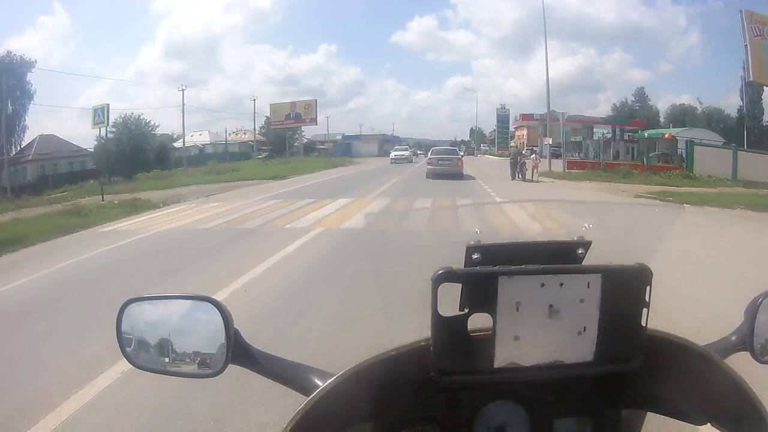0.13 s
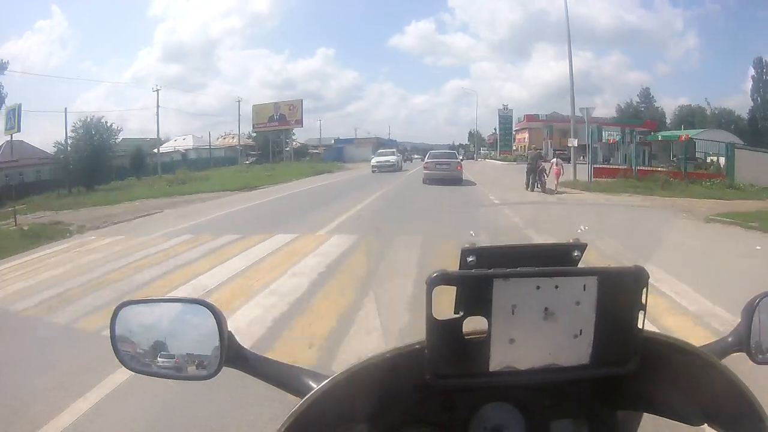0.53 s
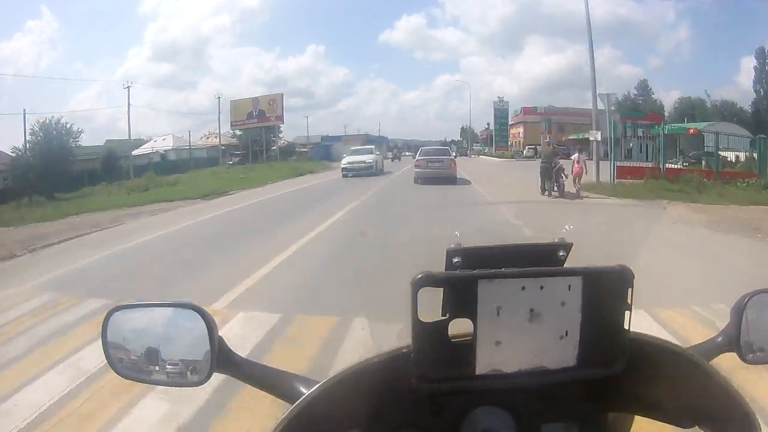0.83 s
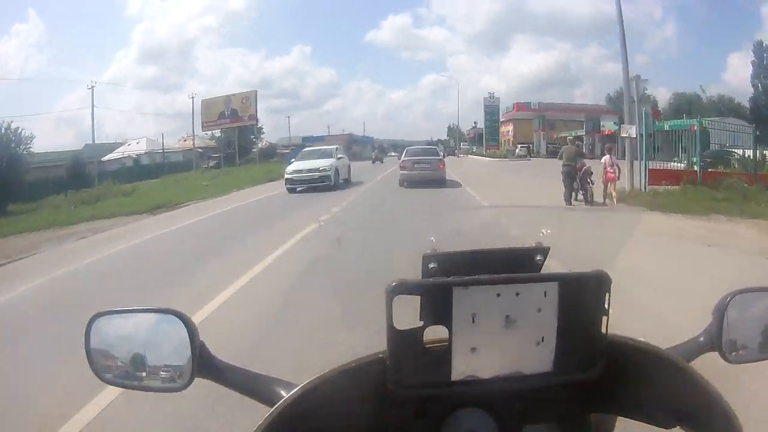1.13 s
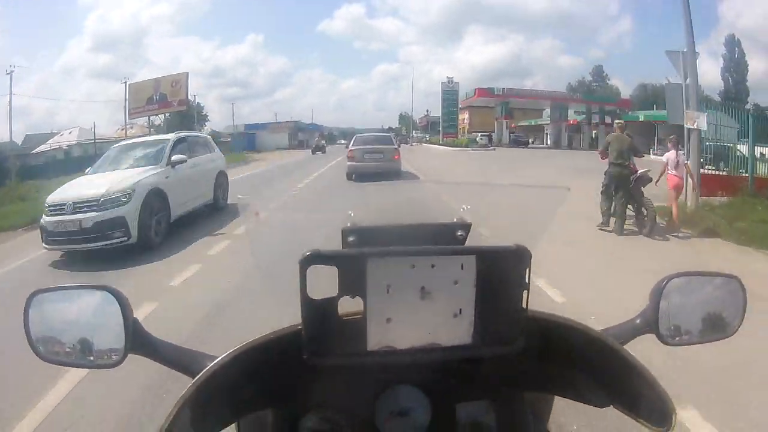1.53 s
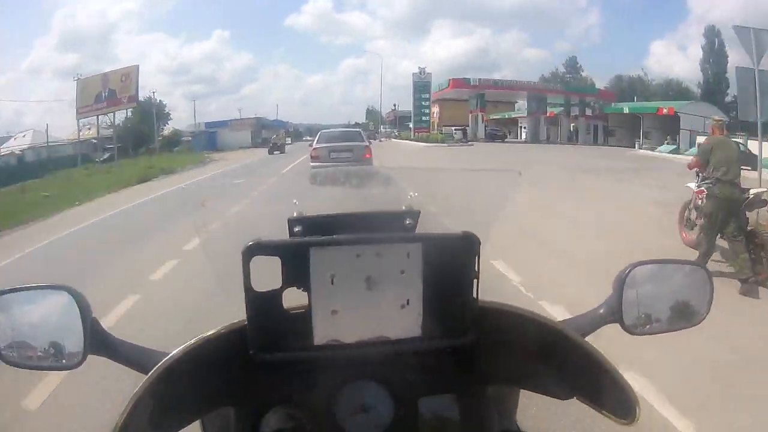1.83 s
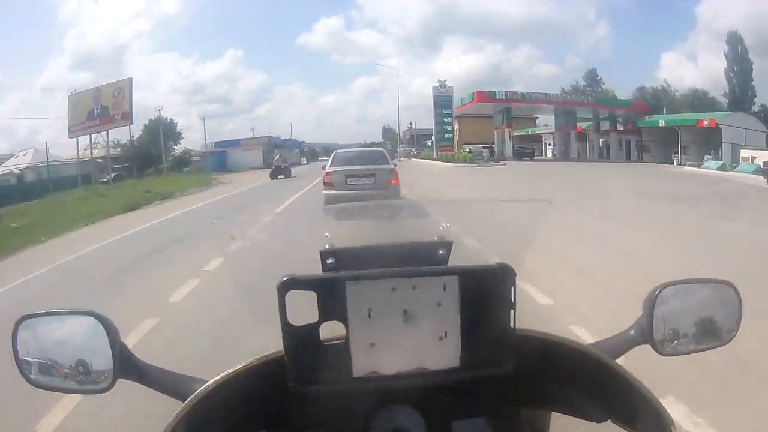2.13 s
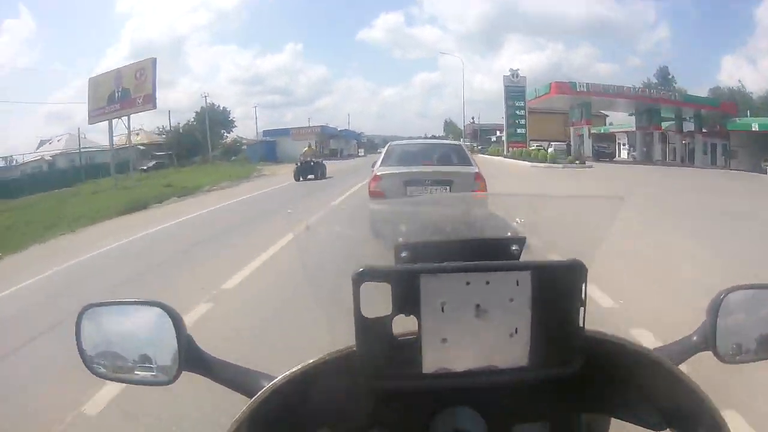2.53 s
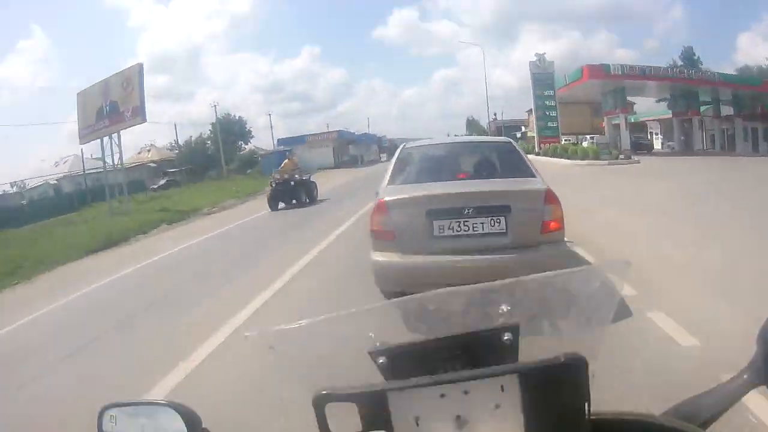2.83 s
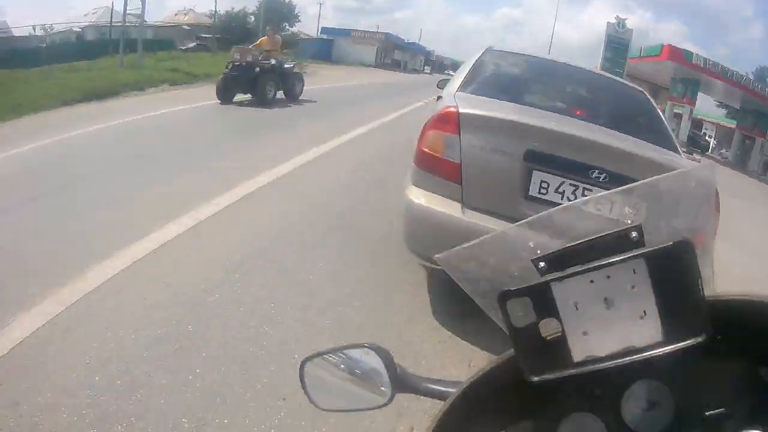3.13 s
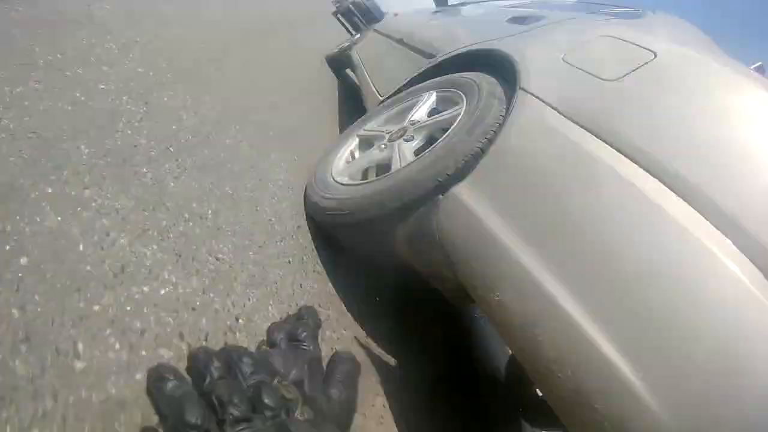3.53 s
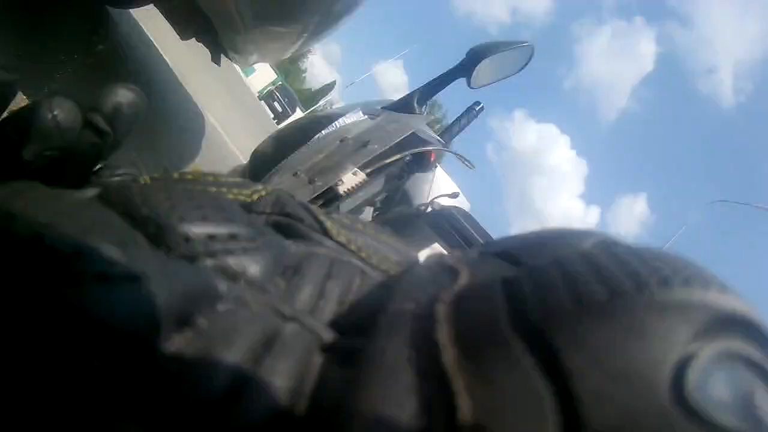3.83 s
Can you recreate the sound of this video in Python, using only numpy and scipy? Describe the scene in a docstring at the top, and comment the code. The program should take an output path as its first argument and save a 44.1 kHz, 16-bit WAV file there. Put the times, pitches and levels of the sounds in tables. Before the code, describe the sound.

Motorcycle crash, close and mono inside a boxy helmet-mounted housing. From 0 to 2.7 s, a quiet, unsteady low engine drone sits under lumpy wind and faint road hiss. Around 2.7-3.27 s the tyre squeals, wavering and rising, while the engine fades. From 3.27 s come knocks; at 3.35-3.95 s, irregular violent crunches, plastic cracks, deep thumps, short rubbing squeaks and gritty scraping overload the microphone, continuing until about 4 s.

```python
"""Open road, heard from inside a closed housing on a motorcyclist's helmet.
A wavering sine is the low engine drone; shaped noise is wind and road hiss. The rider brakes and a tyre
squeals: narrow noise bands around tones. The bike clips a car and falls: blows of crunch, cracks in a
plastic shell and low thumps, with rubbing tones and gritty scraping, overload the small recorder."""
import sys
import numpy as np
from scipy import signal
from scipy.fft import rfft, irfft
from scipy.io import wavfile

SR = 44100
rng = np.random.default_rng(int(sys.argv[2]) if len(sys.argv) > 2 else 0)


def wrap_up_sound(samples):
    """Save the sound to the file named by the first command line argument, as 16-bit audio."""
    columns = np.atleast_2d(samples).T
    # keep every value between -1 and 1, then stretch to whole-number steps
    tamed = np.clip(columns, -1, 1)
    steps = np.round(tamed * 32767).astype(np.int16)
    wavfile.write(sys.argv[1], SR, steps)


N = 176400
TIME_S = np.arange(N) / SR

# blows: t/s, length/s, crunch level/dB, crack drive/dB, thump level/dB, thump f/Hz
BLOWS = [(2.766, 0.0017, -33, -34, -58, 200), (2.7808, 0.0021, -21.5, -0.5, -26, 300),
         (3.266, 0.005, -22.5, -26.5, -41.5, 80.4), (3.292, 0.0034, -30, -16, -13, 59),
         (3.3295, 0.0064, -21.5, -20, -27, 98), (3.344, 0.0045, -15.5, -36, -39, 200),
         (3.3509, 0.0021, -6.5, 2.5, -35, 200), (3.3595, 0.0017, -1, 5, 3, 204),
         (3.3775, 0.0023, -7.5, -19, -5.5, 108), (3.407, 0.0084, -17.5, -10, -30, 101),
         (3.4408, 0.0043, 3.5, 19.5, -14, 119), (3.451, 0.0092, 8.5, 19, 10.5, 894),
         (3.517, 0.0036, -42, -25, -6.5, 54.6), (3.585, 0.004, -20.5, -16, -27, 55),
         (3.651, 0.0038, -18, -5.5, -11, 82.5), (3.675, 0.01, 9.5, 15.5, 7.5, 58.5),
         (3.698, 0.0026, -24, -1, 4, 66), (3.713, 0.0047, -2, 12, 14, 54.7),
         (3.726, 0.0058, 13.5, -6, 20.5, 84), (3.737, 0.0097, 8.5, 18, 7.5, 86),
         (3.75, 0.014, 6, 3.5, 8, 50.5), (3.777, 0.01, -10.5, -16.5, 26, 186.6),
         (3.805, 0.0027, -9, -25, 6, 195), (3.819, 0.0044, -19.5, -27, -4, 153),
         (3.904, 0.001, -26, -18, -20, 100), (3.9171, 0.0045, 8.5, 14.5, 21, 257),
         (3.926, 0.0037, 13, -1, -18, 252), (3.939, 0.021, -13, -16.5, -1.5, 86),
         (3.957, 0.0043, -7.5, -4, -18, 205), (3.9833, 0.0023, -16, -14, -29, 150)]
BURST_RISE_S, BURST_T60_S = 0.00027, 0.021
WAVER = 0.012  # relative pitch spread of squeal and rubs


def blows():
    """Each blow is a crunch through the housing, cracks and a low ringing thump."""
    # crunch spectrum: f/Hz, density/dB per Hz
    crunch_spectrum = [(150, 1), (400, 1), (900, -2.5), (1500, -5.5), (2300, -6), (3000, -28.5),
                       (5000, -19), (7500, -45.5), (10000, -35), (15000, -38.5)]
    thump_cycles, thump_extra_s = 2.75, 0.016  # both lengthen the thump's 60 dB decay
    rough_noise = rng.standard_normal(N) * amp(3.0 * drift(300))
    crunch = housing(colour(rough_noise, crunch_spectrum), share=0.5)
    out = crunch * sum(burst(*row[:3]) for row in BLOWS) + cracks()
    signs = rng.choice([-1, 1], len(BLOWS))
    for (start_s, *_, db, hz), sign in zip(BLOWS, signs):
        first = int(start_s * SR)
        t = np.arange(N - first) / SR
        t60_s = thump_cycles / hz + thump_extra_s
        out[first:] += sign * amp(db - 60 * t / t60_s) * np.sin(2 * np.pi * hz * t)
    return out


def cracks():
    """A snap at the start of each blow and random clicks during it ring the modes of a plastic shell."""
    # shell modes: f/Hz, relative level/dB, t60/s
    shell = [(680, -10, 0.017), (894, -9, 0.035), (1283, -2.5, 0.019), (1970, -0.5, 0.012),
             (3720, -2.5, 0.0063), (5310, -7, 0.0085), (6100, -4.5, 0.0022), (9650, -23, 0.0031)]
    cracks_per_s, scatter_db = 520, 4.04
    clicks = (rng.random(N) < cracks_per_s / SR) * rng.uniform(-1.56, 1, N)
    clicks = clicks * sum(burst(s, length, db) for s, length, _, db, *_ in BLOWS)
    for start_s, _, _, db, *_ in BLOWS:
        clicks[int(start_s * SR) + 20] += amp(db)  # snap, 20 samples into the blow
    out = 0
    for k, (hz, db, t60_s) in enumerate(shell):
        r, w = amp(-60 / (t60_s * SR)), 2 * np.pi * hz / SR
        drive = 0.34 * clicks * amp(db + scatter_db * rng.standard_normal(N)) + 1e-18
        ring = signal.lfilter([0, np.sin(w)], [1, -2 * r * np.cos(w), r * r], drive)
        out = out + (-1) ** k * ring  # alternate mode polarity
    return out


def scrape():
    """Scraping on asphalt: dense grit clicks through the housing over a low rumble."""
    # course: t/s, grinding level/dB, rumble level/dB
    course = [(2.86, -62, -72), (3.24, -35.5, -48.5), (3.27, -40, -26), (3.32, -29.5, -28),
              (3.39, -26.5, -16.5), (3.43, -17.5, -22.5), (3.48, -19, -11.5), (3.50, -29, -31),
              (3.56, -30.5, -23), (3.60, -15.5, -31), (3.655, -19, -16), (3.72, -15.5, 5),
              (3.80, -23.5, -2), (3.835, -33, -13.5), (3.89, -55, -21.5), (3.97, -26, -21),
              (4.0, -27, -12.5)]
    # grit spectrum: f/Hz, density/dB per Hz
    grit_spectrum = [(300, -5.5), (900, -0.5), (1400, 2.5), (2300, -7), (3000, -12), (5000, -15),
                     (7500, -24.5), (10000, -34.5), (15000, -43)]
    rumble_spectrum = [(20, -2.5), (50, 10), (100, 0), (190, -2), (300, 2), (600, -63)]  # f/Hz, dB per Hz
    grits_per_s, grit_spread_db = 2600, 3.5
    grind_db, rumble_db = curves(course)
    hits = rng.random(N) < grits_per_s / SR
    sizes = amp(grit_spread_db * np.minimum(rng.exponential(1, N), 3.0))
    grit = hits * sizes * rng.choice([-1, 1], N)
    rumble = colour(rng.standard_normal(N), rumble_spectrum) * amp(rumble_db)
    grind = housing(colour(grit, grit_spectrum), share=0.53) * amp(grind_db + 2.0 * drift(37))
    return grind + rumble


def squeal():
    """Tyre stick-slip: narrow noise bands around tones; one glides, the others waver in place."""
    # course: t/s, glide f/Hz, glide level/dB, steady-band level/dB
    course = [(2.69, 1282, -50, -71), (2.702, 1242, -28, -35.5), (2.75, 1260, -40, -37),
              (2.825, 1280, -49, -47), (2.845, 1270, -32.5, -31.5), (2.885, 1340, -28.5, -36),
              (2.95, 1380, -39, -31.5), (3.01, 1400, -32, -39.5), (3.08, 1330, -32, -33),
              (3.125, 1240, -31.5, -32), (3.17, 1495, -24.5, -30), (3.203, 1450, -27.5, -27.5),
              (3.222, 1570, -19.5, -48), (3.245, 1570, -31, -30), (3.27, 1575, -59.5, -58)]
    # steady bands: f/Hz, noise width/Hz, level re steady-band level/dB
    steady_bands = [(1210, 107, -3.5), (1576, 110, -4), (2960, 320, -19.5), (4060, 150, -23.5)]
    glide_width_hz, pure_at_db = 64, -30.5
    flicker_hz, flicker_db = 60, 0.36
    glide_hz, glide_db, steady_db = curves(course)
    bands = [(glide_hz, glide_width_hz, glide_db)]
    bands += [(hz, width_hz, db + steady_db) for hz, width_hz, db in steady_bands]
    out = 0
    for hz, width_hz, db in bands:
        phase = 2 * np.pi * np.cumsum(hz * (1 + WAVER * drift(12))) / SR
        tone = np.clip(amp(db - pure_at_db), 1.4, 5)  # louder is purer
        band = (drift(width_hz) + tone) * np.cos(phase) + drift(width_hz) * np.sin(phase)
        out = out + unit(band) * amp(db + flicker_db * drift(flicker_hz))
    return out


def rubs():
    """Rubber and panels rub or ring: short rough tones swell and fade on wavering glides."""
    # rubs: t/s, length/s, first f/Hz, last f/Hz, level/dB
    rub_tones = [(2.7806, 0.0038, 1950, 1950, -15), (2.832, 0.061, 1570, 1530, -36),
                 (2.895, 0.083, 1190, 1130, -33.5), (3.069, 0.064, 1600, 1520, -35),
                 (3.479, 0.036, 1330, 1263, -28.5), (3.535, 0.02, 880, 840, -24.5),
                 (3.675, .015, 2000, 1206, 9), (3.751, .01, 1250, 1210, 2),
                 (3.951, 0.011, 1250, 1400, -15.5)]
    rough_db = 4
    waver = 1 + WAVER * (drift(31.5) + 2 * drift(200))
    rough = amp(rough_db * drift(200))
    out = 0
    for start_s, length_s, first_hz, last_hz, db in rub_tones:
        along = np.clip((TIME_S - start_s) / length_s, 0, 1)
        hz = (first_hz + (last_hz - first_hz) * along) * waver
        swell = np.sqrt(np.abs(np.sin(np.pi * along))) * (along < 1)
        out = out + np.sqrt(2) * amp(db) * swell * np.sin(2 * np.pi * np.cumsum(hz) / SR)
    return out * rough


def engine():
    """The firing tone: a sine of slightly unsteady pitch, faded out after its last row."""
    # drone: t/s, f/Hz, level/dB
    drone = [(0.05, 58.6, -33), (0.26, 53.6, -37), (0.53, 57.7, -25.5), (0.72, 54.8, -49),
             (0.74, 55.7, -30.5), (0.9, 53.3, -44), (1.01, 56.15, -35.5), (1.41, 60.1, -37.5),
             (1.49, 56.7, -31), (1.64, 57.84, -57), (1.67, 55.3, -29.5), (1.91, 57.74, -54.5),
             (2.27, 56.92, -24.5), (2.3, 57.68, -33.5), (2.68, 52.86, -31), (2.89, 54.6, -42),
             (3.0, 56.8, -58)]
    fade_s = 0.2
    hz, db = curves(drone)
    fade = np.clip((drone[-1][0] + fade_s - TIME_S) / fade_s, 0, 1)
    unsteady_hz = hz * (1 + 0.022 * drift(7.6))
    return np.sqrt(2) * fade * amp(db) * np.sin(2 * np.pi * np.cumsum(unsteady_hz) / SR)


def ride():
    """Lumpy wind below; road hiss and mount-shaking bumps ring in the housing above."""
    # course: t/s, wind level before lift/dB, hiss level before lift/dB
    course = [(0.05, -48.5, -49.5), (0.49, -47.5, -50), (1.52, -44, -47.5), (1.74, -45, -47),
              (2.0, -41.5, -47.5), (2.13, -42, -47), (2.38, -45.5, -48), (2.72, -43.5, -47),
              (2.93, -47.5, -44.5), (3.16, -49.5, -46), (3.25, -44, -39)]
    # wind spectrum: f/Hz, density/dB per Hz
    wind_spectrum = [(12, -24.5), (20, 0.5), (42, -13.5), (59, -5), (135, -14.5), (312, -23), (500, -39),
                     (650, -74.5)]
    # hiss spectrum: f/Hz, density/dB per Hz
    hiss_spectrum = [(300, -5.5), (500, -3.5), (1000, -7.5), (1600, -10), (2300, -8.5), (2700, -21.5),
                     (4000, -20.5), (6000, -28.5), (7500, -37.5), (12000, -81)]
    # road bumps: t/s, length/s, level/dB
    bumps = [(1.911, 0.055, -39), (2.132, 0.027, -37), (2.712, 0.032, -34)]
    wind_lift_db, hiss_lift_db = 10.0, 6.5
    low_db, high_db = curves(course)
    wind = colour(rng.standard_normal(N), wind_spectrum) * amp(low_db + wind_lift_db + 2.0 * drift(8.4))
    hiss = housing(colour(rng.standard_normal(N), hiss_spectrum))
    hiss = hiss * amp(high_db + hiss_lift_db + 1.0 * drift(25))
    shake = housing(colour(rng.standard_normal(N) * amp(4.4 * drift(150)), hiss_spectrum))
    return wind + hiss + shake * sum(burst(*row) for row in bumps)


def housing(x, share=1):
    """Each resonance lifts or cuts its band by share of its dB; the result has rms 1."""
    # housing resonances: f/Hz, width/Hz, boost at share 1/dB
    resonances = [(310.7, 51, 6.5), (672, 32, 8.5), (1143, 22.4, 10), (1296, 203, 9), (2555, 400, -3.5),
                  (2900, 70, 6.5), (3420, 86, 11), (4170, 230, 3), (4320, 380, -13)]
    for hz, width_hz, db in resonances:
        r, w = np.exp(-np.pi * width_hz / SR), 2 * np.pi * hz / SR
        numerator = np.array([1, 0, -1]) * (1 - r * r) / 2
        band = signal.lfilter(numerator, [1, -2 * r * np.cos(w), r * r], x)
        x = x + (amp(db * share) - 1) * band
    return unit(x)


def burst(start_s, length_s, db):
    """Envelope that rises fast, holds and decays exponentially."""
    t = TIME_S - start_s
    decay_db = 60 * np.clip(t - length_s, 0, 1) / BURST_T60_S
    return np.clip(t / BURST_RISE_S, 0, 1) * amp(db - decay_db)


def colour(x, spectrum):
    """Shape by a spectrum with a minimum-phase filter (folded cepstrum), to rms 1."""
    size = 8192
    hz, db = np.transpose(spectrum)
    bins_hz = np.arange(size // 2 + 1) * SR / size
    log_gain = np.interp(np.log(bins_hz + 1), np.log(hz), db) * np.log(10) / 20
    cepstrum = irfft(log_gain)
    cepstrum[1:size // 2] *= 2
    cepstrum[size // 2 + 1:] = 0
    impulse = irfft(np.exp(rfft(cepstrum)))
    return unit(signal.fftconvolve(x, impulse)[:N])


def drift(rate_hz):
    """Random wander of spread 1: noise through two equal poles at rate_hz."""
    step, settle = 20, 4000  # computed every 20 samples, start-up dropped
    r = np.exp(-2 * np.pi * step * rate_hz / SR)
    noise = rng.standard_normal(N // step + settle + 2)
    slow = signal.lfilter([1], [1, -2 * r, r * r], noise)[settle:]
    return np.interp(np.arange(N) / step, np.arange(len(slow)), unit(slow))


def curves(rows):
    """Table columns as signals in time, linear between rows."""
    s, *columns = np.transpose(rows)
    return [np.interp(TIME_S, s, c) for c in columns]


def unit(x):
    """Scale to rms 1."""
    return x / np.sqrt(np.mean(x ** 2) + 1e-20)


def amp(db):
    """Decibels to gain."""
    return 10 ** (np.asarray(db) / 20)


def scene():
    """All sources, mono."""
    return (engine() + ride() + squeal() + rubs() + blows() + scrape())[None, :]


def record(dry):
    """Hard overload with drooping tops, a dull top end with a narrow dip, self noise, a steep cutoff."""
    overload, droop_hz, self_noise_db = 0.92, 14, -77
    roll_off_hz, dip_hz, dip_width_hz, stopband_hz = 4670, 7960, 1180, 15900
    start_s = 0.036  # silence before this
    x = np.clip(dry[0], -overload, overload)
    x = signal.lfilter(*signal.butter(1, droop_hz, "high", fs=SR), x)
    x = signal.lfilter(*signal.butter(1, roll_off_hz, fs=SR), x)
    x = x - signal.lfilter(*signal.iirpeak(dip_hz, dip_hz / dip_width_hz, fs=SR), x)
    x = np.clip(x + amp(self_noise_db) * rng.standard_normal(N), -1, 1)
    x = x * (TIME_S > start_s)
    return signal.sosfilt(signal.cheby2(12, 40, stopband_hz, fs=SR, output="sos"), x)[None, :]


dry = scene()
out = record(dry)
wrap_up_sound(out)
```